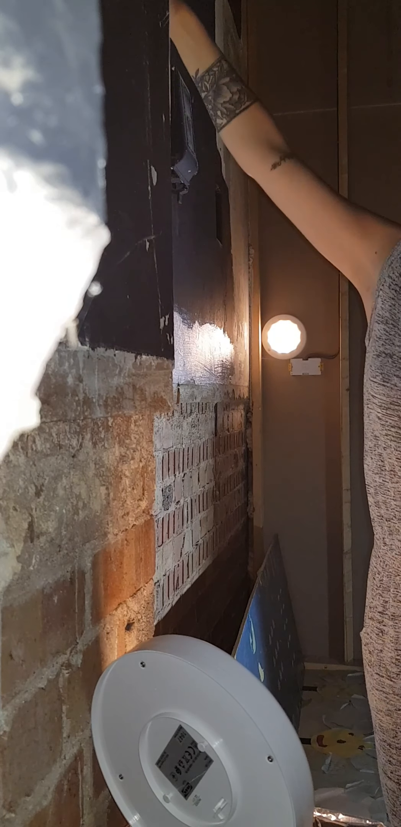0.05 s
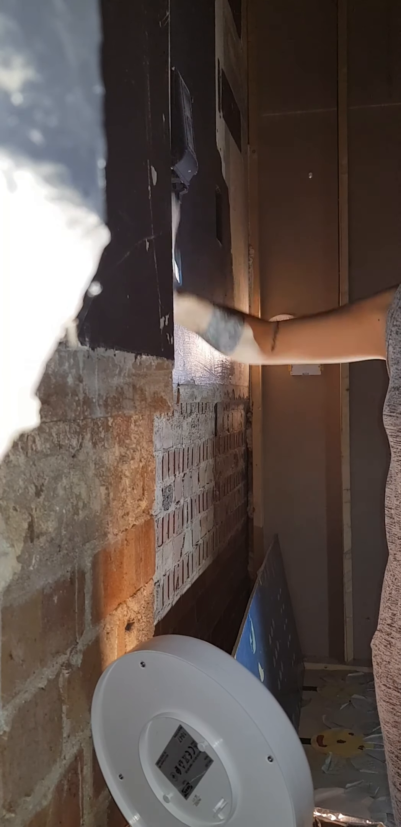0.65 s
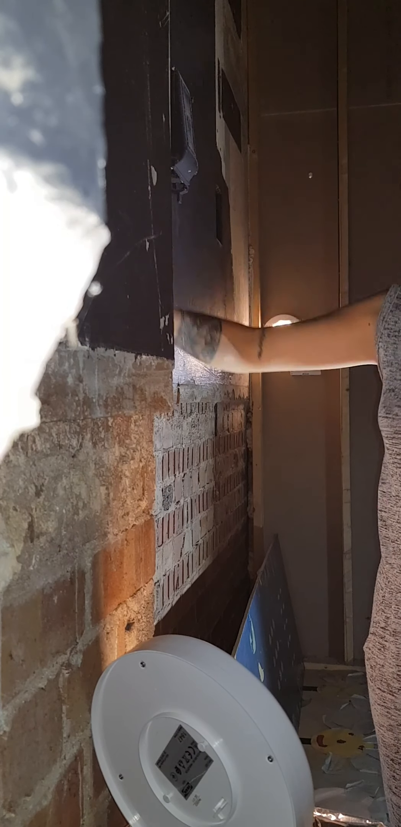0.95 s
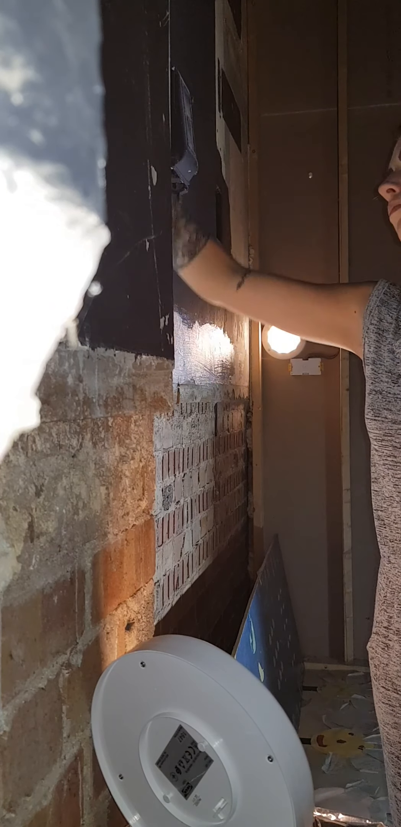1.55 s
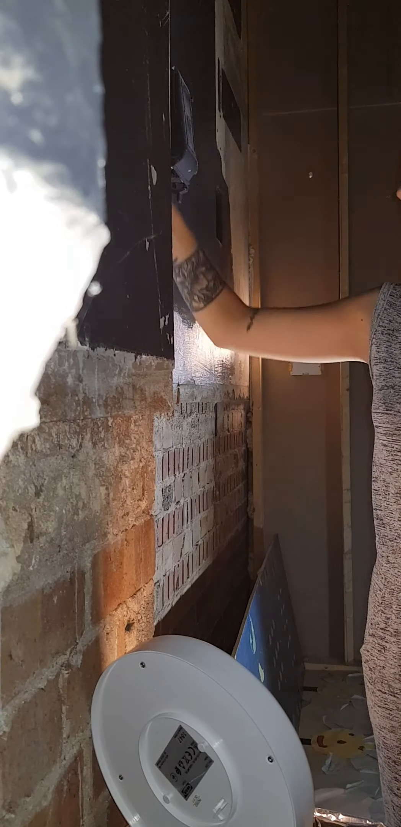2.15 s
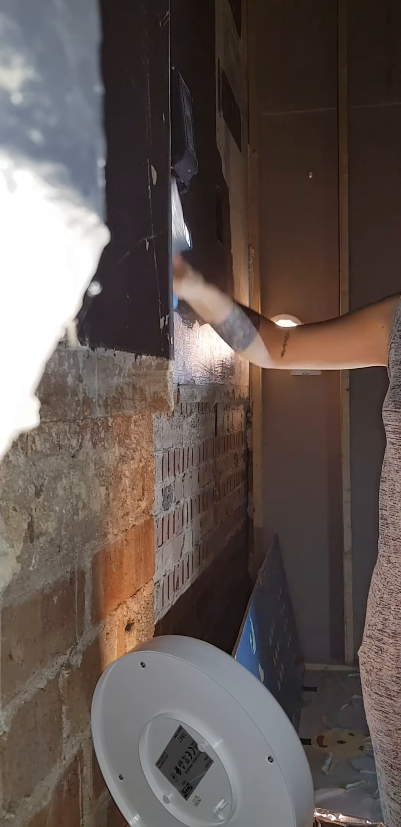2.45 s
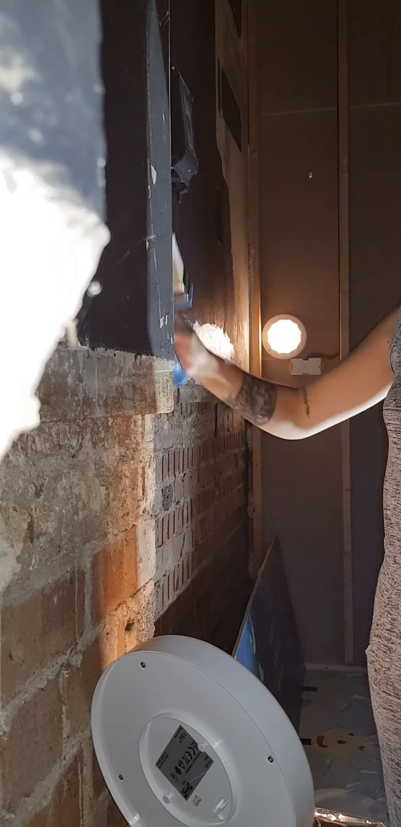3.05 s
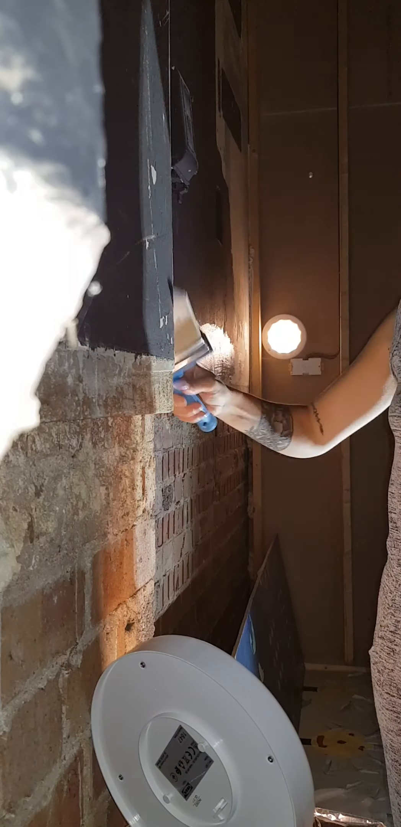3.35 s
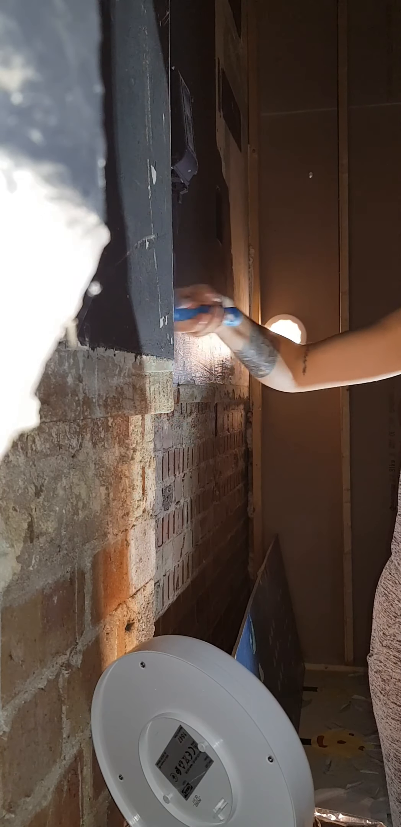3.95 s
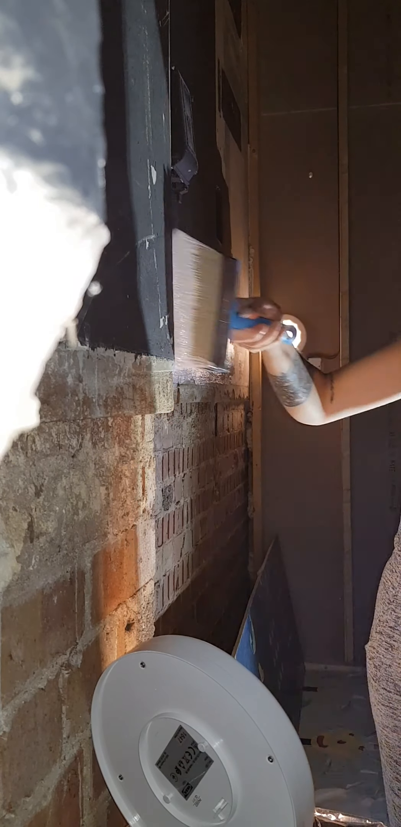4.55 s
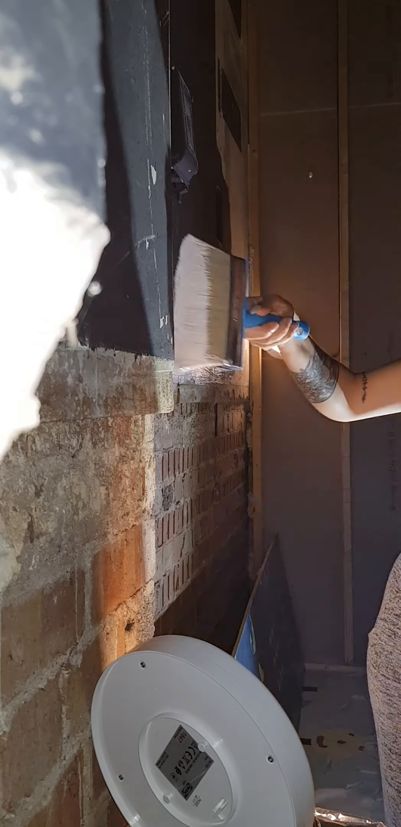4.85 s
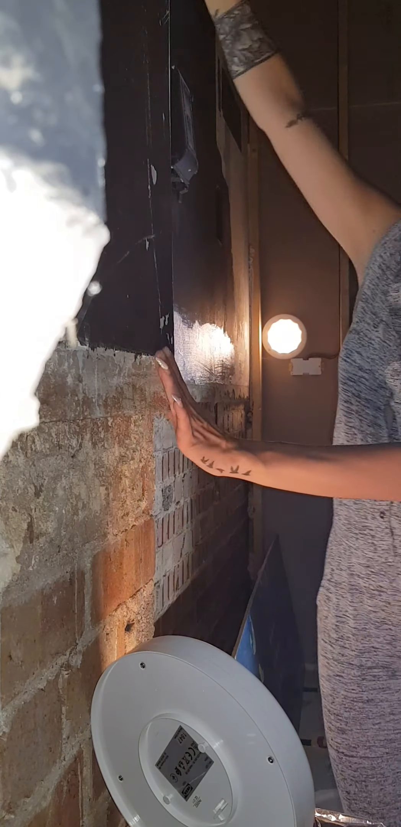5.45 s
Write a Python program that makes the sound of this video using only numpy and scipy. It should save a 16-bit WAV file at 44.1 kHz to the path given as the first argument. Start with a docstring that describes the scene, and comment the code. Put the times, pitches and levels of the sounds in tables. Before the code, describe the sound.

Quick scratchy brush strokes on wood indoors, broken by two hard knocks and scattered taps, ending in a loud swish and clatter.

```python
"""A wide paintbrush sweeps back and forth over a wooden panel above a brick wall, in a small bare room.
Over faint room tone the bristles hiss with every stroke, flop over at the turns and squeak softly once.
Around one second the stock taps an edge and knocks hard twice on the panel, with a fast whip between.
The strokes go on with light taps and flicking tufts; from 2.5 s the brush rasps whenever pressed flat.
A distant rumble grows, and just after five seconds the stock clatters as the brush is swung away."""
import sys
import numpy as np
from scipy import signal
from scipy.fft import rfft, irfft, next_fast_len
from scipy.io import wavfile
from scipy.ndimage import uniform_filter1d, minimum_filter1d, map_coordinates

SR = 44100
rng = np.random.default_rng(int(sys.argv[2]) if len(sys.argv) > 2 else 0)


def wrap_up_sound(samples):
    """Save the sound to the file named by the first command line argument, as 16-bit audio."""
    columns = np.atleast_2d(samples).T
    # keep every value between -1 and 1, then stretch to whole-number steps
    tamed = np.clip(columns, -1, 1)
    steps = np.round(tamed * 32767).astype(np.int16)
    wavfile.write(sys.argv[1], SR, steps)


N = 242550
TIME = np.arange(N) / SR
AFTER = np.arange(SR * 3 // 4) / SR  # seconds since a contact


def amp(db):
    """Decibels to gain."""
    return 10 ** (np.asarray(db) / 20)


def along(points, hz):
    """A curve of (Hz, value) points, read on a log frequency axis."""
    f, v = np.transpose(points)
    return np.interp(np.log(hz + 1), np.log(f), v)


def wobble(rate):
    """A smooth random curve with rate knots a second."""
    return map_coordinates(rng.standard_normal(int(N * rate / SR) + 4), [TIME * rate])


def filtered(x, response):
    """Shape x with a gain that depends on frequency."""
    n = x.shape[-1]
    m = next_fast_len(n + SR // 4)
    return irfft(rfft(x, m) * response(np.fft.rfftfreq(m, 1 / SR)), m)[..., :n]


def unit(x, size=None):
    """Scale a stereo sound so its centre has rms 1 over its first size samples."""
    return x / np.sqrt(np.mean(x.mean(0)[:size] ** 2) + 1e-20)


def add(track, s, sound):
    """Mix a sound into the track at time s."""
    start = round(s * SR)
    track[:, start:start + sound.shape[1]] += sound[:, :N - start]


# Stereo width of the room. Each row: frequency in Hz, left-right correlation.
CORRELATION = [(60, 0.92), (130, 0.99), (250, 0.96), (500, 0.63), (1000, 0.7), (2000, 0), (12000, 0.13)]
# Stereo lean. Each row: frequency in Hz, left minus right in dB.
LEAN = [(100, -0.5), (400, -1), (700, 0.5), (1300, -5.5), (2400, 0.5), (4400, -5), (8000, -3.5),
        (15000, -8.5)]
def diffuse(size):
    """Noise spread through the room: bass centred, treble wide and to the right."""
    angle = lambda hz: np.arccos(np.clip(along(CORRELATION, hz), -1, 1)) / 2
    spread = lambda hz: np.array([np.cos(angle(hz)), np.sin(angle(hz))])
    mid, side = filtered(rng.standard_normal((2, size)), spread)
    lean = lambda hz: amp(np.outer([.5, -.5], along(LEAN, hz))) / np.cos(angle(hz))
    return filtered(np.array([mid + side, mid - side]), lean)


def noise(spectrum):
    """Coloured stereo noise of rms 1."""
    return unit(filtered(diffuse(N), lambda hz: amp(along(spectrum, hz))))


# Colour of the still room. Each row: frequency in Hz, relative level in dB.
AIR_COLOUR = [(15, -29), (25, 0), (91, -2), (235, -15), (449, -4), (1090, -17.5), (1590, -10), (2500, -4),
              (3050, -13.5), (3490, -31), (3780, -34), (15800, -27)]
# Fader ride of the rumble. Each row: time in seconds, level in dB.
RUMBLE_RIDE = [(0, -80), (3.4, -80), (4.0, -72), (4.5, -64.5), (5.0, -62.5), (5.5, -66)]
def room_tone(air_db=-76.5):
    """Faint steady air and a low distant rumble that grows."""
    rumble_db = np.interp(TIME, *np.transpose(RUMBLE_RIDE))
    rumble = noise([(20, -25.5), (40, -10.5), (52, -11), (66, -11.5), (130, -26), (400, -67)])
    return amp(air_db) * noise(AIR_COLOUR) + amp(rumble_db) * rumble


def swell(s, rise, fall, roundness=.25):
    """One sweep of the arm: gain 1 at time s, a rounded top, slopes of 20 dB per rise or fall time."""
    distance = (TIME - s) / np.where(TIME < s, rise, fall)
    return amp(-20 * (np.hypot(distance, roundness) - roundness))


def grit(rate, spread_db):
    """Friction comes in tiny catches of uneven strength: a gain of rms 1."""
    catches = amp(spread_db * wobble(rate))
    return catches / np.sqrt(np.mean(catches ** 2))


def walls(x, echo=.12, count=12):
    """Near walls return weak copies within 25 ms and comb the sound."""
    out = x.copy()
    for side in range(2):
        for lag in (rng.uniform(.002, .025, count) * SR).astype(int):
            out[side, lag:] += echo * x[side, :-lag]
    return unit(out)


# Brush strokes. Each row: moment of top speed in seconds, fine hiss level in dB, rise in seconds,
# fall in seconds, coarse hiss relative to fine in dB.
BRUSH_STROKES = [(.065, -57, 0.34, 0.2, -3.5), (.353, -51.5, .097, 0.11, -3.5),
                 (0.692, -48.5, 0.093, 0.093, -4), (.975, -56, .06, .07, 4),
                 (1.276, -61.5, .12, 0.062, -11), (1.447, -63.5, 0.053, 0.11, -3.5),
                 (1.721, -61, 0.14, 0.078, -1), (1.977, -64, 0.098, 0.11, -3),
                 (2.175, -79.5, 0.021, 0.13, 5), (2.335, -60.5, 0.038, 0.156, -4.5),
                 (2.449, -60.5, 0.027, 0.0443, 3), (2.696, -51, 0.13, .079, -0.5),
                 (2.96, -50.5, 0.085, 0.082, -3), (3.198, -54.5, 0.095, 0.075, -2.5),
                 (3.379, -60.5, .066, 0.099, -3.5), (3.708, -54, 0.11, 0.04, -0.5),
                 (3.795, -52.5, 0.022, .075, -4.5), (3.995, -55, 0.094, 0.096, -1),
                 (4.313, -55, 0.12, .081, 0), (4.573, -53, .072, .085, -3.5), (4.81, -55, .071, 0.074, -3),
                 (5.011, -55.5, .052, 0.054, -1), (5.138, -63.5, 0.073, .1, 2.5),
                 (5.262, -36, .04, 0.055, 6), (5.5, -67.5, 0.055, .1, 1.5)]
def strokes():
    """Envelopes of the fine and the coarse hiss; overlapping strokes add in power."""
    fine, coarse = np.zeros((2, N))
    for s, db, rise, fall, coarse_db in BRUSH_STROKES:
        power = (amp(db) * swell(s, rise, fall)) ** 2
        fine += power
        coarse += power * amp(coarse_db) ** 2
    return np.sqrt(fine), np.sqrt(coarse)


# Colour of sliding bristles. Each row: frequency in Hz, relative level in dB.
BRISTLE_COLOUR = [(250, -7.5), (600, -7), (850, -12), (1550, -6), (2600, -6.5), (3300, -15), (4200, -5),
                  (5600, -3.5), (7500, -7), (8500, -12.5), (10200, 2), (11700, -4.5), (12800, 0),
                  (15800, -11)]
def bristles(fine_gain, coarse_gain, dulling=.45):
    """Bristle tips slip over the grain; a stiffer stroke adds coarse, lower hiss and loses its top."""
    slips = walls(noise(BRISTLE_COLOUR)) * grit(rate=1300, spread_db=.83) * grit(rate=90, spread_db=1.5)
    fine = filtered(slips, lambda hz: hz > 9000)
    coarse = slips - fine
    coarse /= filtered(coarse, lambda hz: hz > 3500).mean(0).std()  # its treble sets its level
    fine = unit(fine)
    top = filtered(fine, lambda hz: hz > 12000)
    top_gain = (fine_gain / coarse_gain) ** dulling
    return fine_gain * (fine - top + top * top_gain) + coarse_gain * coarse


def narrow(pitch, width_hz, centre_hz=1500):
    """A narrow band of stereo noise, rms 1, shifted to follow a moving pitch."""
    band = unit(filtered(diffuse(N), lambda hz: 1 / (1 + ((hz - centre_hz) / width_hz) ** 2)))
    shift = np.exp(2j * np.pi * np.cumsum(pitch - centre_hz) / SR)
    return (signal.hilbert(band) * shift).real


def rubbing(effort, rub_db=-59, rub_hz=1560,
            squeak_s=.51, squeak_db=-68.5, squeak_hz=1500, sag_hz_per_s=600):
    """Damp bristles rub with a resonance that outlasts the hiss and once firms into a sagging squeak."""
    rub = narrow(rub_hz + 70 * wobble(7), width_hz=190)
    rub *= amp(rub_db) * np.sqrt(effort / effort.max())
    squeak = narrow(squeak_hz - sag_hz_per_s * (TIME - squeak_s), width_hz=95)
    squeak *= amp(squeak_db) * swell(squeak_s, rise=.22, fall=.22)
    flutter = amp(4 * wobble(22))
    return (rub + squeak) * flutter


# Reverb of the bare room. Each row: frequency in Hz, seconds to fade by 60 dB.
ROOM_DECAY = [(60, 0.61), (400, 0.47), (750, 0.53), (1500, 0.54), (4000, 0.37), (12000, 0.51)]
def strike(colour, length, room_db, rise):
    """A short contact of the given colour and its room tail; rms 1 over the first 30 ms."""
    burst = filtered(diffuse(len(AFTER)), colour)
    hz, t, bands = signal.stft(burst, SR, nperseg=256)
    decay = amp(-60 * t / along(ROOM_DECAY, hz)[:, None])
    tail = signal.istft(bands * decay, SR, nperseg=256)[1][:, :len(AFTER)]
    envelope = (np.exp(-AFTER / length) + amp(room_db)) * (1 - np.exp(-AFTER / rise))
    return unit(tail * envelope, size=1323)


def stock(ring_hz, length, sharpness, skirt=.025, soft_hz=4200):
    """A light contact rings one resonance of the stock; a longer one feeds the room more."""
    resonance = lambda f: 1 / (1 + (sharpness * (f / ring_hz - ring_hz / (f + 1))) ** 2)
    colour = lambda f: (resonance(f) + skirt) / (1 + (f / soft_hz) ** 2)
    return strike(colour, length, room_db=10 * np.log10(length / .07), rise=.0003)


# Colour of the struck wall. Each row: frequency in Hz, relative level in dB.
THUD_COLOUR = [(25, -35), (55, -9), (100, 1), (140, -2.5), (220, -8.5), (400, -16), (1000, -55.5)]
def thud(length):
    """The dull answer of the wall to a contact."""
    return strike(lambda f: amp(along(THUD_COLOUR, f)), length, room_db=-5.5, rise=.00096)


# The brush flops over between strokes. Each row: start in seconds, knock level in dB,
# thud level in dB, swish level in dB, contact length in seconds.
BRUSH_TURNS = [(.232, -72, -62.5, -70.5, 0.0055), (0.28, -64, -60.5, -72, .04),
               (.573, -69.5, -64.5, -59.5, .01), (1.610, -54, -62, -72, .009),
               (2.254, -88, -76, -72, 0.017), (2.553, -64, -59, -64, .007),
               (3.112, -66.5, -57.5, -60.5, .03), (3.32, -56, -61.5, -61.5, .02),
               (3.49, -96, -85, -67.5, 0.028), (4.165, -59, -67, -74, 0.0025),
               (4.478, -74, -62.5, -86, 0.058), (4.732, -62.5, -61.5, -83.5, 0.055),
               (4.948, -70, -60.5, -85, .011)]
def turns(ring_hz=442.2):
    """At a turn the stock rocks against the wall and the bristles swish over to their other side."""
    out = np.zeros((2, N))
    for s, knock_db, thud_db, swish_db, length in BRUSH_TURNS:
        knock = stock(ring_hz, length, sharpness=2.8)
        swish = strike(lambda f: amp(along(BRISTLE_COLOUR, f)), length, room_db=-9.5, rise=length / 10)
        add(out, s, amp(knock_db) * knock + amp(thud_db) * thud(length) + amp(swish_db) * swish)
    return out


# Light wooden taps. Each row: start in seconds, level in dB, ring in Hz, contact length in seconds.
EDGE_TAPS = [(0.862, -61.5, 800, 0.12), (1.438, -61, 1090, 0.0066), (2.602, -47.5, 1736, 0.024),
             (2.604, -57, 280, 0.057), (3.207, -62, 1490, 0.0048), (3.219, -59.5, 774, .017),
             (3.763, -37, 1402, .004), (3.771, -40.5, 2050, .0014), (3.778, -40, 810, 0.06),
             (3.797, -53.5, 350, 0.024), (3.818, -41, 715, 0.0068), (3.865, -49, 890, 0.0046),
             (4.234, -62, 1500, 0.031), (4.533, -48, 760, .06), (5.013, -50.5, 1500, 0.0047),
             (5.026, -44, 668, 0.11), (5.086, -49, 292, 0.15), (5.247, -35, 148, .016),
             (5.492, -56, 900, 0.011)]
def taps(thud_db=-16, flat_hz=330, thud_db_per_octave=-7):
    """The stock clips an edge; the flatter it lands, the lower it rings and the more the wall thuds."""
    out = np.zeros((2, N))
    for s, db, ring_hz, length in EDGE_TAPS:
        wall_db = thud_db + thud_db_per_octave * max(0, np.log2(ring_hz / flat_hz))
        ring = stock(ring_hz, length, sharpness=2.2)
        add(out, s, amp(db) * (ring + amp(wall_db) * thud(length)))
    return out


# Modes of the wooden panel. Each row: pitch in Hz, relative level in dB, seconds to fade by 60 dB.
PANEL_MODES = [(67, -31.5, 0.19), (105.2, -17, .28), (135, -23, 0.2), (199, -21, 0.26),
               (252.5, -16.5, 0.18), (303, -10, .3), (354.3, -3, 0.237), (377.7, -4, 0.17), (417, -3, 0.35),
               (478.5, -11, 0.29), (614.6, -4, 0.15), (640, -11, .16), (687.6, -7.5, 0.12),
               (789, -12.5, 0.15), (943, -23.5, 0.22), (1349, -31.5, .2)]
# Colour of the ferrule's clack. Each row: frequency in Hz, relative level in dB.
CLACK_COLOUR = [(700, 7), (1300, -5.5), (2300, -7), (3200, -15.5), (5500, -15.5), (9000, -31.5),
                (15000, -36)]
# Two hard knocks, then the closing clatter. Each row: start in seconds, overall gain in dB,
# upper-mode boost in dB, clack trim in dB, bristle slap trim in dB, attack in seconds.
PANEL_KNOCKS = [(0.922, -10, 4.5, -14.5, -26.5, 0.015), (1.156, -6, 0.5, -13.5, -45.5, 0.0066),
                (5.206, -37.5, 6, -2, -43, 0.00034), (5.222, -27.5, 7.5, -7, -23, 0.001),
                (5.247, -23.5, 15, -5, -21, 0.00032), (5.296, -28.5, 19.5, -24, -36, 0.0033)]
def knocks(ring_db=-3, room_db=-9, mode_width_hz=22, upper_hz=550, drive_s=.022, free_ring=.28):
    """The stock hits the panel: its modes ring on in the room, the ferrule clacks, the bristles slap."""
    out = np.zeros((2, N))
    hz, mode_db, t60 = np.transpose(PANEL_MODES)[:, :, None]
    sign = (-1) ** np.arange(len(hz))[:, None]  # neighbouring modes push the air in opposite senses
    slap_colour = lambda f: amp(along(BRISTLE_COLOUR, f)) / (1 + (f / 13000) ** 6)
    for s, db, upper_db, clack_db, slap_db, attack in PANEL_KNOCKS:
        # a harder corner wakes the upper modes
        gain = amp(mode_db + upper_db * (hz > upper_hz) + rng.normal(0, .55, hz.shape))
        # short waves reach left and right out of step
        phase = np.multiply.outer([1, -1], rng.normal(0, 1, hz.shape) * hz / 1800)
        modes = sign * gain * amp(-60 * AFTER / t60) * np.sin(2 * np.pi * hz * AFTER + phase)
        # the blow drives the panel briefly, then it rings freely
        envelope = (1 - np.exp(-AFTER / attack)) * (np.exp(-AFTER / drive_s) + free_ring)
        ring = unit(modes.sum(1) * envelope, size=2200)
        # long-lived modes feed the room most
        body = lambda f: np.sqrt(((gain * t60) ** 2 / (1 + ((f - hz) / mode_width_hz) ** 4)).sum(0))
        bloom = strike(body, length=.033, room_db=9.5, rise=attack)
        add(out, s, amp(db + ring_db) * ring + amp(db + room_db) * bloom)
        clack = strike(lambda f: amp(along(CLACK_COLOUR, f)), length=.037, room_db=-7.5, rise=.002)
        add(out, s + .004, amp(db + clack_db) * clack)
        slap = strike(slap_colour, length=.016, room_db=-12.5, rise=.005)
        add(out, s + .001, amp(db + slap_db) * slap)
    return out


# Colour of whipped bristles. Each row: frequency in Hz, relative level in dB.
WHIP_COLOUR = [(1760, -48), (3000, -15.5), (4130, -12), (4780, -24.5), (4980, -12.5), (5930, -7.5),
               (7410, -4.5), (8450, -20), (10800, -0.5), (15800, -20)]
def whip(peak_s=1.122, level_db=-41):
    """A very fast sweep just before the second knock makes the bristles sing in a few high bands."""
    sweep = amp(level_db) * swell(peak_s, rise=.02, fall=.083)
    return sweep * noise(WHIP_COLOUR) * grit(rate=200, spread_db=1.5)


# Colour of a flicking tuft. Each row: frequency in Hz, relative level in dB.
FLICK_COLOUR = [(1000, -23), (2200, -5.5), (3300, -15.5), (4600, -7), (5250, -1.5), (6000, -8),
                (8000, -13.5), (12000, -13), (16000, -23)]
# Single bright ticks of bristle. Each row: start in seconds, level in dB.
TUFT_FLICKS = [(1.5622, -74.5), (3.7648, -59.5), (3.7822, -55.5), (4.0132, -50), (4.0257, -47.5)]
def flicks():
    """Tufts catch on an edge and spring free."""
    out = np.zeros((2, N))
    for s, db in TUFT_FLICKS:
        tick = strike(lambda f: amp(along(FLICK_COLOUR, f)), length=.005, room_db=-15.5, rise=.0004)
        add(out, s, amp(db) * tick)
    return out


# Colour of the rasp. Each row: frequency in Hz, relative level in dB.
RASP_COLOUR = [(25, -49.5), (60, -18), (130, -6.5), (350, -1), (550, -2), (800, -3), (1150, -6.5),
               (1600, -10), (2400, -6.5), (3300, -16), (5000, -12.5), (8000, -36.5)]
# The brush pressed flat. Each row: moment of hardest pressure in seconds, level in dB,
# rise in seconds, fall in seconds.
FLAT_DRAGS = [(2.566, -56, .015, .12), (2.655, -50, 0.084, .15), (3.79, -46, 0.049, 0.107),
              (4.556, -51.5, 0.0327, 0.12), (5.028, -49.5, 0.0325, 0.13), (5.265, -31, 0.061, .1)]
def drags():
    """The flattened brush judders over the rough surface and rasps."""
    pressure = sum(amp(db) * swell(s, rise, fall) for s, db, rise, fall in FLAT_DRAGS)
    return pressure * walls(noise(RASP_COLOUR)) * grit(rate=130, spread_db=2.7)


def scene():
    """Brush friction, contacts and room tone together."""
    fine_gain, coarse_gain = strokes()
    friction = bristles(fine_gain, coarse_gain) + rubbing(coarse_gain) + drags() + whip()
    return friction + knocks() + turns() + taps() + flicks() + room_tone()


def record(dry, low_cut_hz=42, ceiling=.86, top_hz=15850):
    """Thin the deepest bass, ride down the loudest peaks and cut off the extreme treble."""
    thinned = signal.sosfilt(signal.butter(3, low_cut_hz, "high", fs=SR, output="sos"), dry)
    needed = np.minimum(1, ceiling / (np.abs(thinned).max(0) + 1e-9))
    gain = uniform_filter1d(minimum_filter1d(needed, size=661), size=441)  # hold 15 ms, smooth 10 ms
    return filtered(thinned * gain, lambda hz: hz < top_hz)


dry = scene()
out = record(dry)
wrap_up_sound(out)
```